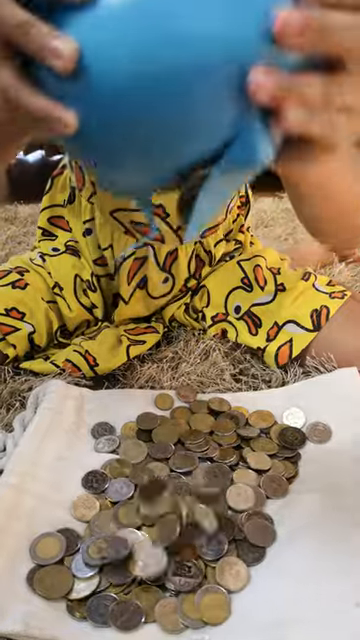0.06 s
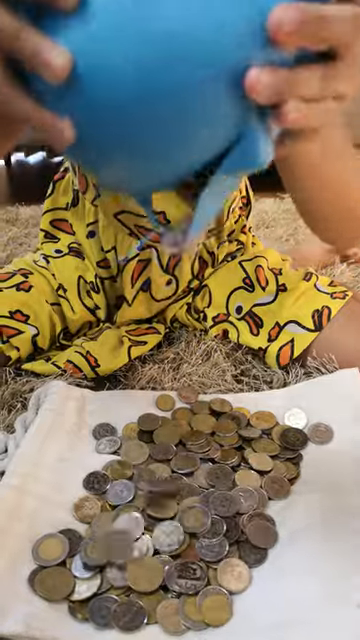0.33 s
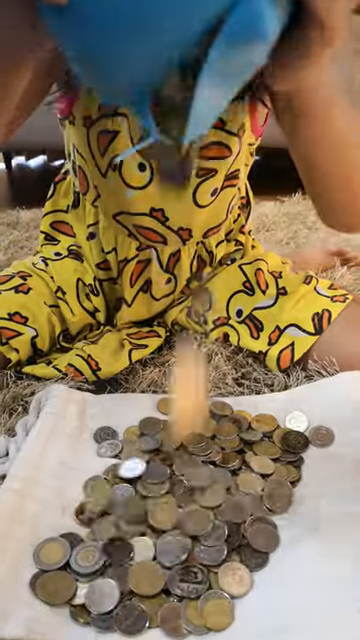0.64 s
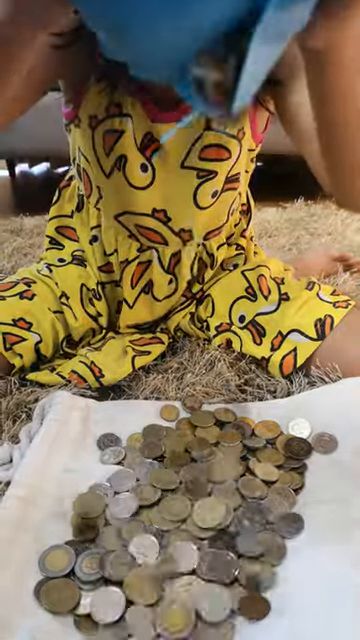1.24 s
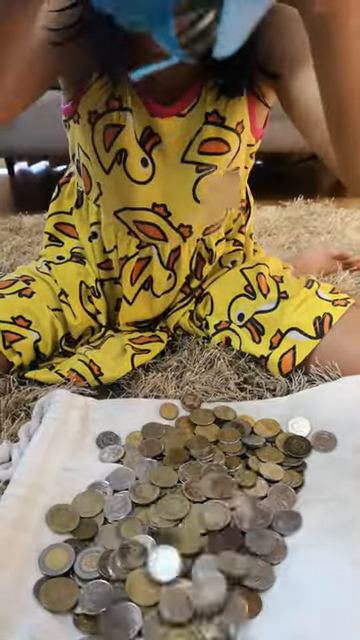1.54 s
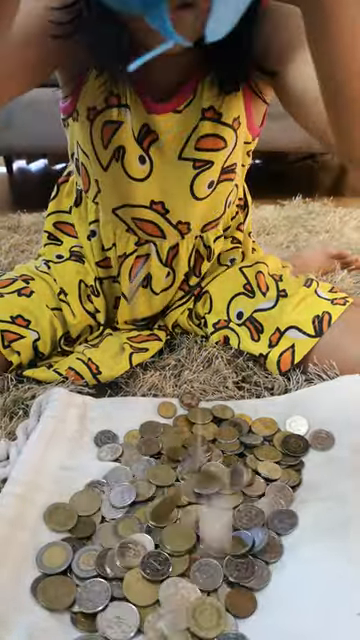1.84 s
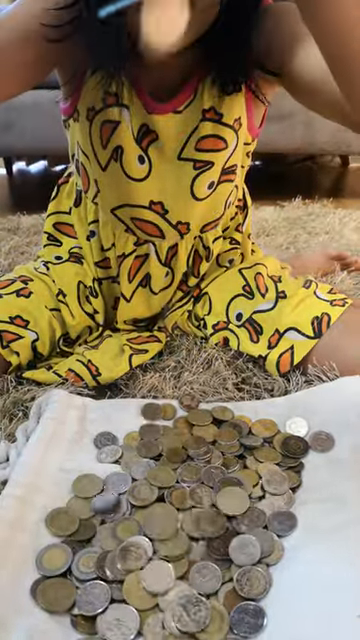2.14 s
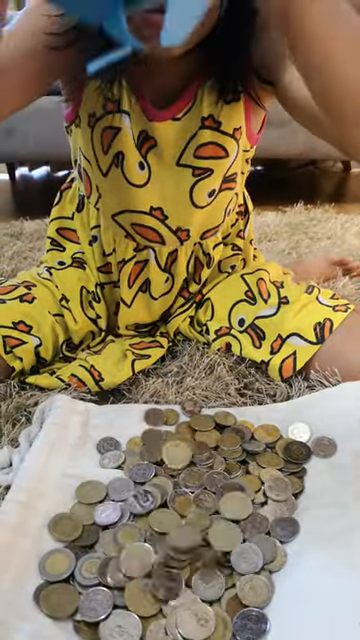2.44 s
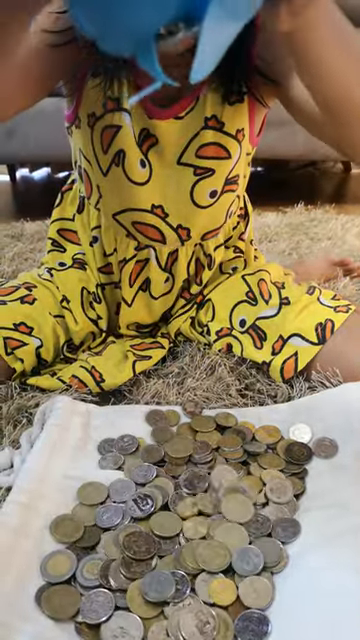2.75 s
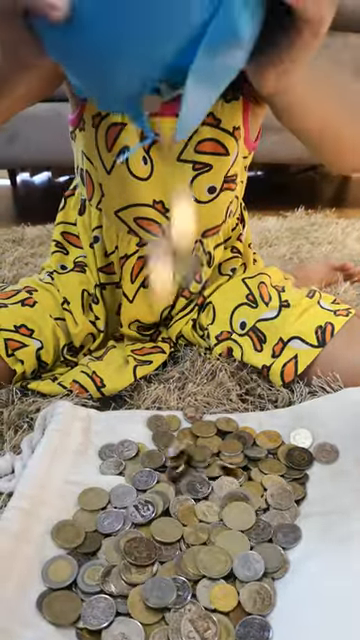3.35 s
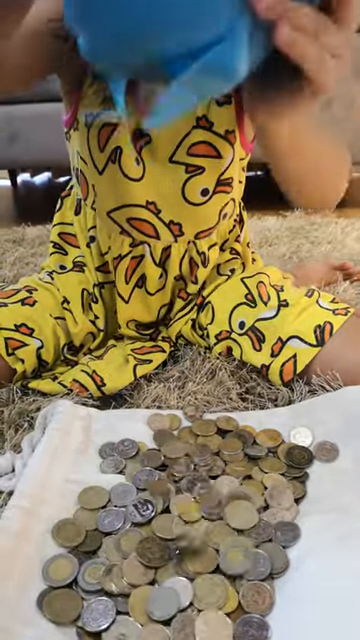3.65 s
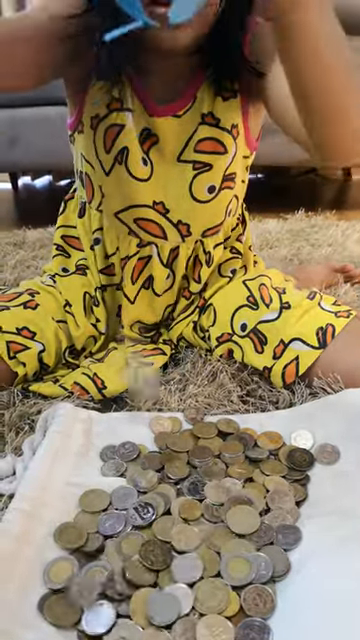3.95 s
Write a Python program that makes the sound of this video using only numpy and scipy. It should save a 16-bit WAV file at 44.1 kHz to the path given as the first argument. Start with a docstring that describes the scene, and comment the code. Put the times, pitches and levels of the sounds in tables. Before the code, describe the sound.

Coins clatter out of a shaken plastic piggy bank, landing on more coins with occasional thuds.

```python
"""A plastic piggy bank is shaken upside down, close by, in a furnished room.
From the start, coins churn in its hollow shell, drop out, and clash, skitter and ring on a pile on a cloth.
The heaviest landings thud through the floor, hardest at 0.4 s. The shaking fades by 2.3 s while coins
still land; it resumes at 3 s and more coins fall. A limiter holds the sharpest peaks throughout."""
import sys
import numpy as np
from scipy import signal
from scipy.fft import rfft, irfft, next_fast_len
from scipy.io import wavfile
from scipy.ndimage import uniform_filter1d, minimum_filter1d, map_coordinates

SR = 44100
rng = np.random.default_rng(int(sys.argv[2]) if len(sys.argv) > 2 else 0)


def waveform_to_disk(signal):
    """Save audio, clipped to [-1, 1], as 16-bit WAV at the path in sys.argv[1]."""
    frames = np.transpose(np.atleast_2d(signal))
    scaled = np.clip(frames, -1, 1) * 32767
    samples = np.round(scaled).astype(np.int16)
    wavfile.write(sys.argv[1], SR, samples)


N = 176400
CLICK_PAN_DB, RING_PAN_DB = 6.5, 6


def amp(db):
    """Decibels to gain."""
    return 10 ** (np.asarray(db) / 20)


def seconds(length_s):
    """Time axis."""
    return np.arange(int(length_s * SR)) / SR


def unit_energy(x):
    """Each row scaled to energy 1."""
    return x / np.sqrt(np.sum(x ** 2, -1, keepdims=True) + 1e-20)


def pan(db):
    """Left and right gains; positive is right."""
    return amp([[-db], [db]])


def convolved(x, response):
    """Sound through a response, at most N samples."""
    return signal.fftconvolve(np.atleast_2d(x), np.atleast_2d(response), axes=1)[:, :N]


def colour(points, size=4096):
    """Minimum-phase response of energy 1 from (frequency [Hz], level [dB]) points."""
    hz, db = np.transpose(points)
    gain = amp(np.interp(np.log(np.fft.rfftfreq(size, 1 / SR) + 1), np.log(hz), db))
    cepstrum = irfft(np.log(gain))
    cepstrum[1:size // 2] *= 2
    cepstrum[size // 2 + 1:] = 0
    return unit_energy(irfft(np.exp(rfft(cepstrum))))


def burst(t60_s, length_s=0.1):
    """Decaying stereo noise of energy 1."""
    t = seconds(length_s)
    return unit_energy(rng.standard_normal((2, len(t))) * amp(-60 * t / t60_s))


def resonator(modes, detune=0):
    """Stereo response of energy 1: damped modes of alternating sign."""
    t, phase_rad = seconds(0.1), np.array([[0], [1.8]])
    response = 0
    for k, (hz, width_hz, db) in enumerate(modes):
        pitch_hz = hz * (1 + detune * rng.normal())
        decay = amp(db) * width_hz * np.exp(-np.pi * width_hz * t)
        response += (-1) ** k * decay * np.cos(2 * np.pi * pitch_hz * t + phase_rad)
    return unit_energy(response)


def add(out, start_s, sound):
    """Mix a sound in at a time."""
    part = out[:, max(0, int(start_s * SR)):][:, :sound.shape[-1]]
    part += sound[..., :part.shape[1]]


def shower(curve, rate_per_s, spread_db):
    """Random contacts (time [s], gain) following a (time [s], level [dB]) curve."""
    count = int(rate_per_s * N / SR)
    jitter, chance = rng.random((count, 2)).T
    times_s = (np.arange(count) + 2 * jitter) / rate_per_s
    sizes = unit_energy(amp(-spread_db * np.log(np.maximum(chance, 0.02)))) * np.sqrt(N)
    return list(zip(times_s, sizes * amp(np.interp(times_s, *np.transpose(curve)))))


def struck(contacts, sounds):
    """Each contact (time [s], gain) plays one of the sounds at random."""
    out = np.zeros((2, N))
    for (start_s, gain), k in zip(contacts, rng.integers(len(sounds), size=len(contacts))):
        add(out, start_s, gain * sounds[k])
    return out


# Room tone spectrum (frequency [Hz], level [dB])
ROOM_SPECTRUM = [(20, -2), (42, 5), (70, -7), (150, -12.5), (400, -23.5), (1500, -32)]


def room_tone(level_db=-49):
    """Faint rumble, nearly mono."""
    noise = rng.standard_normal(N) + 0.033 * rng.standard_normal((2, N))
    return amp(level_db) * convolved(noise, colour(ROOM_SPECTRUM))


# Heavy landings (time [s], thud level [dB], knock level [dB])
HEAVY_LANDINGS = [(0.119, -19.5, -15.5), (0.363, -9.5, -9.5), (0.87, -20, -19), (.930, -24, -23),
                  (1.203, -34, -17.5), (1.225, -27, -26), (1.557, -18.5, -15.5), (1.986, -24, -22),
                  (2.404, -29, -13.5), (2.440, -26.5, -14.5), (2.552, -20, -12.5), (3.990, -24.5, -24)]


def floor_thuds(rise_s=0.00079, fall_s=0.009, floor_hz=16.2, floor_t60_s=0.71, knock_t60_s=0.014):
    """A low push through the floor with a dull knock on top."""
    out, t = np.zeros((2, N)), seconds(0.31)
    push = (1 - np.exp(-t / rise_s)) * (1 - t / fall_s / 2) * np.exp(-t / fall_s)
    sway = amp(-14.5 - 60 * t / floor_t60_s) * np.sin(2 * np.pi * floor_hz * t)
    knock_band = signal.butter(2, [750, 3400], "bandpass", fs=SR)
    for start_s, thud_db, knock_db in HEAVY_LANDINGS:
        noise = rng.standard_normal((2, len(t))) * amp(knock_db - 1 - 60 * t / knock_t60_s)
        knock = signal.lfilter(*knock_band, noise)
        add(out, start_s, amp(thud_db) * (push + sway) + pan(CLICK_PAN_DB) * knock)
    return out


# Coin surges in the bank, one per shake (peak time [s], level [dB])
SURGES = [(0.028, -30.5), (0.081, -30), (0.246, -28.5), (0.349, -34.5), (0.429, -28), (0.581, -32.5),
          (0.82, -34.5), (1.007, -28.5), (1.14, -37), (1.326, -35.5), (1.419, -34.5), (1.672, -41.5),
          (1.742, -40), (1.941, -36.5), (2.136, -36.5), (2.22, -49.5), (2.977, -44.5), (3.082, -28),
          (3.177, -28.5), (3.276, -27), (3.438, -43), (3.676, -35), (3.8, -31.5), (3.881, -33.5)]


def churning(contrast=1, hold_s=0.02, rise_db_per_s=334, fall_db_per_s=170):
    """Contacts in the bank: each surge swells, holds and dies away."""
    t = np.linspace(0, N / SR, N // 100)
    peak_s, peak_db = np.transpose(SURGES)[:, :, None]
    away_s = np.maximum(np.abs(t - peak_s) - hold_s / 2, 0)
    surges = amp(peak_db - away_s * np.where(t < peak_s, rise_db_per_s, fall_db_per_s))
    level_db = 20 * np.log10(np.linalg.norm(surges, axis=0) + 1e-9)
    return shower(np.transpose([t, contrast * level_db]), rate_per_s=1200, spread_db=5)


# Air modes of the hollow (frequency [Hz], width [Hz], level [dB])
CAVITY_MODES = [(405, 45, -8), (443, 24, 0), (590, 90, -14)]


def cavity_hum(gain_db=-16.5, growth_db_per_s=2.5):
    """Coins drum on the air inside, which swings more freely as the bank empties."""
    drumming = struck(churning(contrast=0.72), [np.ones(1), -np.ones(1)])[0]
    air = convolved(drumming, resonator(CAVITY_MODES))
    hum = signal.lfilter(*signal.butter(2, [340, 640], "bandpass", fs=SR), air)
    return hum * amp(gain_db + growth_db_per_s * np.arange(N) / SR) * pan(-2)


# Plastic shell modes (frequency [Hz], width [Hz], level [dB])
SHELL_MODES = [(980, 170, -6.5), (1430, 130, -13), (2430, 110, -1), (2720, 100, 0), (3120, 130, 0),
               (3420, 90, -4)]


def shell_knock(scrape, echo_db=2, scrape_db=5.5, shell_db=2.5):
    """A click echoes in the bank and rings the shell, which the coins' weight retunes."""
    click = unit_energy(burst(t60_s=0.00078) + amp(echo_db) * burst(t60_s=0.029))
    shell = resonator(SHELL_MODES, detune=0.045)
    shell = signal.lfilter(*signal.butter(2, 700, "highpass", fs=SR), shell)
    size = click.shape[1]
    ring = unit_energy(convolved(click[0], shell)[:, :size])
    return amp(scrape_db) * convolved(click, scrape)[:, :size] + amp(shell_db) * ring


# Scrape and click of coins in the bank (frequency [Hz], level [dB])
SCRAPE_SPECTRUM = [(330, -11.5), (520, -27.5), (720, -16), (1000, -17), (1450, -6), (2300, 3), (3200, 2.5),
                   (4200, -3.5), (5600, -1.5), (7800, -0.5), (9800, -4), (11500, -23), (13400, -32)]
# Clumps hitting the wall (time [s], level [dB])
WALL_SLAPS = [(0.0829, -14), (.2673, -15.5), (.4105, -22), (0.4746, -19), (1.056, -20), (1.4044, -18),
              (2.133, -22.5), (2.961, -29.5), (3.046, -18), (3.0646, -17.5), (3.126, -22), (3.1553, -14),
              (3.182, -9.5), (3.268, -12), (3.685, -21), (3.798, -17.5), (3.8678, -15.5)]


def bank_rattle(clump_s=0.009, slap_gain_db=10):
    """Coins churn in the bank and slap its wall in clumps of three."""
    contacts = churning()
    for start_s, db in WALL_SLAPS:
        contacts += [(start_s + lag_s, amp(db + slap_gain_db)) for lag_s in [0, *clump_s * rng.random(2)]]
    scrape = colour(SCRAPE_SPECTRUM)
    return pan(0.5) * struck(contacts, [shell_knock(scrape) for _ in range(60)])


# Coins tumbling free (time [s], frequency [Hz], level [dB], free time [s])
TUMBLES = [(.95, 7938, -21, .08), (.96, 7665, -28, .08), (1.335, 8254, -18, .02), (1.727, 8182, -17, .11),
           (1.727, 7493, -25, .11), (2.11, 14905, -27, .035), (2.269, 8010, -22, .07),
           (2.3, 7838, -29, .12), (2.439, 10422, -25, .04), (2.549, 13770, -29, .06),
           (2.58, 10752, -28, .08), (3.356, 7608, -30, .11), (3.48, 7924, -30, .11),
           (3.63, 10752, -22, .025), (3.745, 7393, -25, .04)]


def tumbling_coins(rise_s=0.0097, fall_db_per_s=45, stop_t60_s=0.14, flutter_hz=53.5, depth=0.45):
    """A tumbling coin rings with an uneven flutter until its next touch stops it."""
    out, t = np.zeros((2, N)), seconds(0.3)
    for start_s, hz, db, free_s in TUMBLES:
        damping_db = fall_db_per_s * t + 60 * np.maximum(t - free_s, 0) / stop_t60_s
        envelope = np.minimum(t / rise_s, 1) * amp(db - damping_db)
        knots = rng.standard_normal((4, 32))
        flutter = depth * np.array([map_coordinates(row, [t * flutter_hz], mode="wrap") for row in knots])
        phase_rad = 2 * np.pi * (hz * t + rng.random((2, 1))) + flutter[2:]
        add(out, start_s, envelope * (1 + flutter[:2]) * np.sin(phase_rad))
    return out * pan(RING_PAN_DB)


# Glancing hits (time [s], level [dB])
GLANCES = [(1.1847, -3), (1.298, -8), (1.4636, -7), (1.4685, -5), (1.7112, -10), (1.9015, -7), (1.9874, -6),
           (2.7003, -15), (2.829, -13), (3.356, -7), (3.5079, -7), (3.72, -7), (3.727, -7)]
# Their bright snap (frequency [Hz], level [dB])
SNAP_SPECTRUM = [(900, -22), (3500, -10.5), (8000, 12), (15000, -5)]


def glancing_cracks(gain_db=18.5):
    """A coin glances off a firmly lying one: a dry crack, no scatter."""
    out = np.zeros((2, N))
    for start_s, db in GLANCES:
        add(out, start_s, amp(db + gain_db) * burst(t60_s=0.011))
    return pan(CLICK_PAN_DB) * convolved(out, colour(SNAP_SPECTRUM)) / amp(CLICK_PAN_DB)


# Coin modes damped by the pile (frequency [Hz], pitch spread [ratio], level [dB], T60 [s])
COIN_MODES = [(7650, 0.0396, -2, 0.028), (9330, 0.068, -4, 0.018), (13270, 0.0237, -7, 0.053),
              (14200, 0.013, -34.5, 0.11)]


def coin_clink(click, ring_db=0, click_t60_s=0.0042, t60_spread_db=3.5, level_spread_db=4.1):
    """One contact: a hard click and a brief ring at the coin's own pitches."""
    t = seconds(0.12)
    sound = pan(CLICK_PAN_DB) * convolved(burst(click_t60_s, len(t) / SR), click)[:, :len(t)]
    for hz, spread, db, t60_s in COIN_MODES:
        pitch_hz = hz * (1 + spread * rng.normal())
        decay = amp(-60 * t / (t60_s * amp(t60_spread_db * rng.normal())))
        ring = unit_energy(decay * np.sin(2 * np.pi * (pitch_hz * t + rng.random((2, 1)))))
        sound += pan(RING_PAN_DB) * amp(db + ring_db + rng.normal(0, level_spread_db, (2, 1))) * ring
    return sound / amp(CLICK_PAN_DB)


def landing(start_s, db, slap_s=0.004, scatter_s=0.03, scatter_db=-9.5, fall_db_per_s=260):
    """A coin hits edge first, falls flat and jolts its neighbours."""
    hits = [(start_s, amp(db)), (start_s + slap_s * rng.uniform(0.7, 1.2), amp(db))]
    for lag_s in scatter_s * rng.random(7):
        hits.append((start_s + lag_s, amp(db + scatter_db - fall_db_per_s * lag_s)))
    return hits


# Metal-on-metal click (frequency [Hz], level [dB])
CLICK_SPECTRUM = [(200, -55), (900, -28), (1500, -22), (2700, -19.5), (3800, -13.5), (5500, 1.5), (7500, 3),
                  (9300, 3.5), (10500, 2), (11800, -11), (13500, -13), (15000, -10.5)]
# Coins landing on the pile (time [s], level [dB])
PILE_LANDINGS = [(0.0158, -27), (0.201, -10), (0.223, -13), (0.3227, -6.5), (0.5206, -7), (0.53, -11),
                 (.631, -14.5), (0.7349, -10.5), (0.745, -5), (0.7981, -13.5), (.867, -9.5), (.905, -2.5),
                 (1.066, -7.5), (1.116, -11.5), (1.203, -10), (1.335, -9), (1.502, -5.5), (1.553, -8),
                 (1.605, -15), (1.7272, -3), (1.825, -8.5), (1.932, -10), (2.2146, -16), (2.269, -6),
                 (2.367, -15.5), (2.401, -9.5), (2.4382, -12), (2.549, -7.5), (2.7569, -7.5), (3.468, -6.5),
                 (3.54, -9.5), (3.6102, -4.5), (3.982, -8.5)]
# Sliding and settling of the pile (time [s], level [dB])
SLIDE_CURVE = [(0, -23), (.1, -23), (.16, -32), (.49, -29), (.56, -23.5), (.7, -28), (.78, -27),
               (1.14, -25.5), (1.48, -29), (1.56, -23.5), (1.68, -32), (1.8, -35), (1.86, -25),
               (2.02, -27.5), (2.25, -38.5), (2.3, -31), (2.64, -30), (2.69, -39), (2.79, -31),
               (2.85, -32.5), (2.88, -81), (3.1, -38), (3.3, -30), (3.45, -35), (3.56, -26), (3.82, -32.5),
               (3.96, -66)]


def coin_pile(landing_gain_db=17, slide_gain_db=2.5):
    """Coins land and keep the pile sliding; a landing coin is pressed down and rings less."""
    click = colour(CLICK_SPECTRUM)
    hits = [hit for start_s, db in PILE_LANDINGS for hit in landing(start_s, db + landing_gain_db)]
    landed = struck(hits, [coin_clink(click, ring_db=-2) for _ in range(40)])
    slips = shower(SLIDE_CURVE, rate_per_s=750, spread_db=2.9)
    sliding = struck(slips, [coin_clink(click) for _ in range(80)])
    return landed + amp(slide_gain_db) * sliding


def scene():
    """Bank and pile in a small, soft room."""
    coins = bank_rattle() + cavity_hum() + coin_pile() + glancing_cracks() + tumbling_coins()
    reverb = amp(-7.5) * convolved(coins, burst(t60_s=0.077, length_s=0.44))
    return coins + reverb + floor_thuds() + room_tone()


def record(dry):
    """Fast limiter per channel, then a band limit."""
    ceiling_db, hold_s, cutoff_hz = -2.5, 0.0006, 15600
    window = int(hold_s * SR)
    gain = np.minimum(1, amp(ceiling_db) / (np.abs(dry) + 1e-9))
    limited = dry * uniform_filter1d(minimum_filter1d(gain, window), window)
    size = next_fast_len(N + SR // 2)
    passband = np.fft.rfftfreq(size, 1 / SR) < cutoff_hz
    return irfft(rfft(limited, size) * passband, size)[:, :N]


dry = scene()
out = record(dry)
waveform_to_disk(out)
```